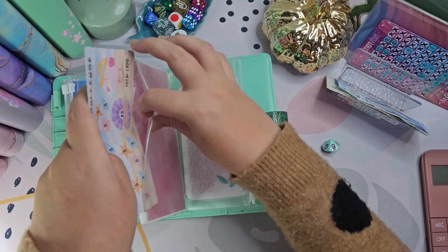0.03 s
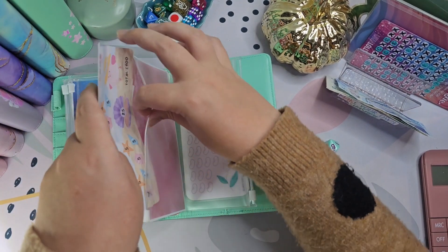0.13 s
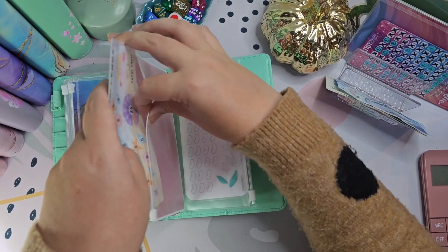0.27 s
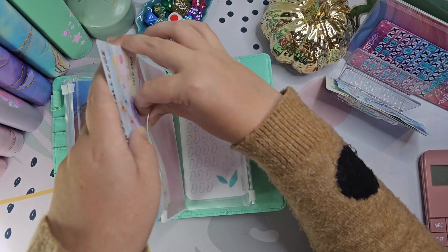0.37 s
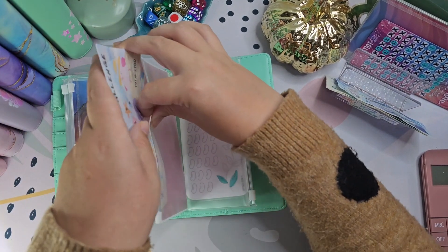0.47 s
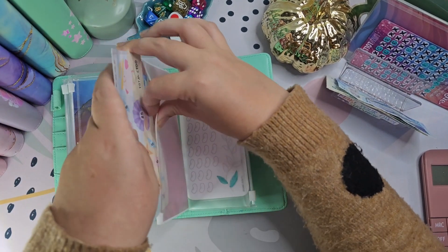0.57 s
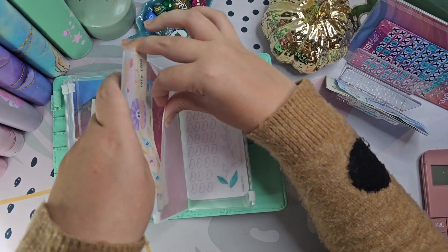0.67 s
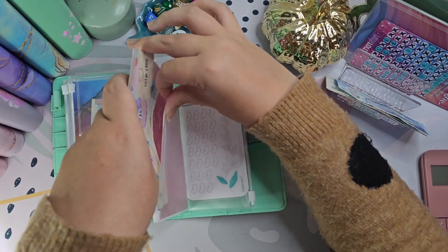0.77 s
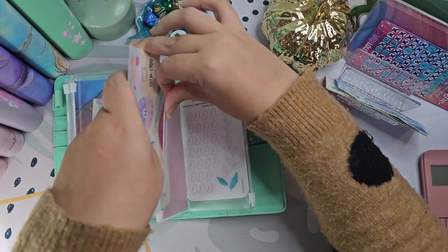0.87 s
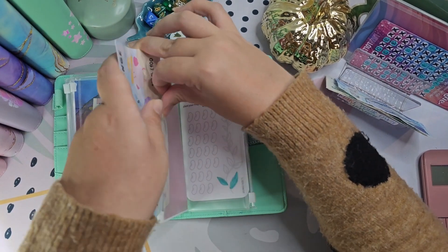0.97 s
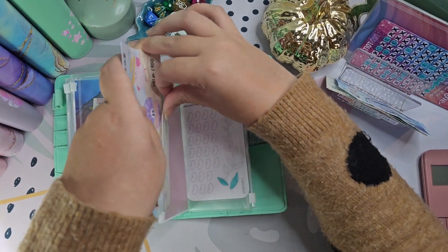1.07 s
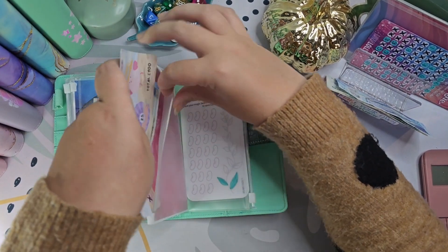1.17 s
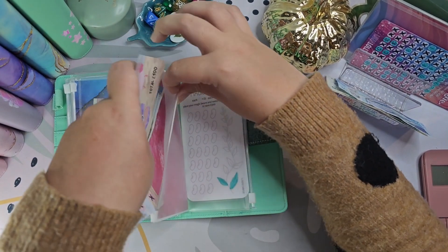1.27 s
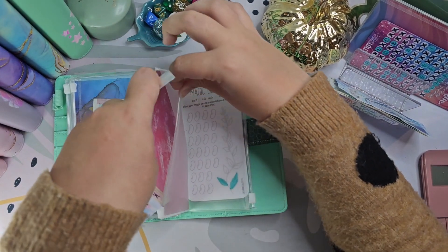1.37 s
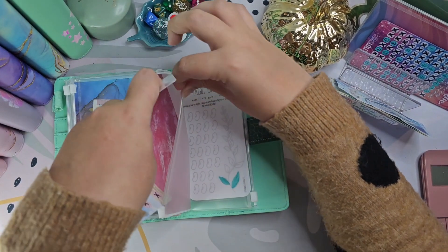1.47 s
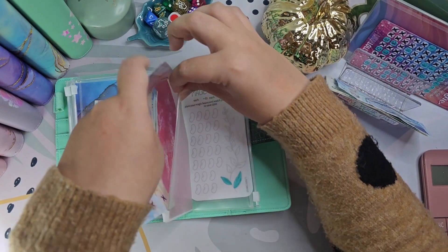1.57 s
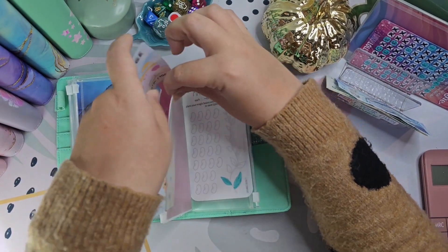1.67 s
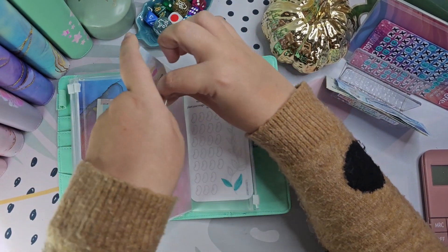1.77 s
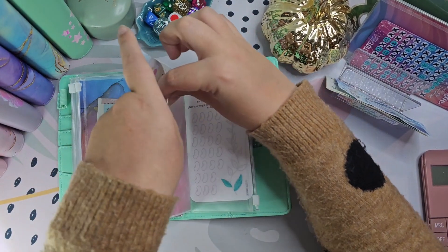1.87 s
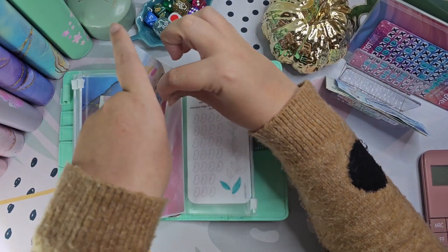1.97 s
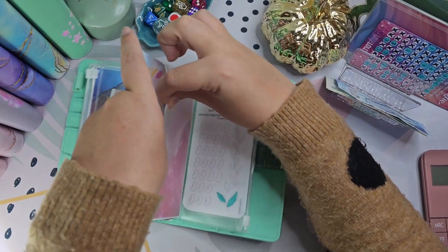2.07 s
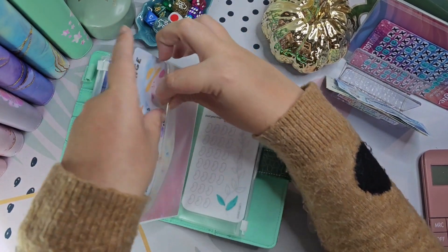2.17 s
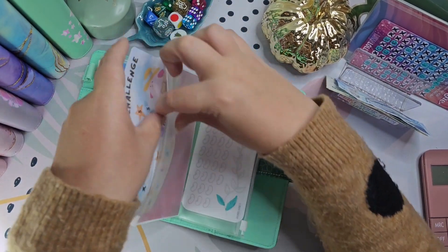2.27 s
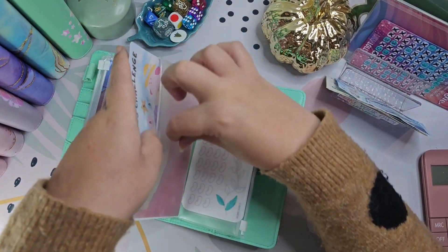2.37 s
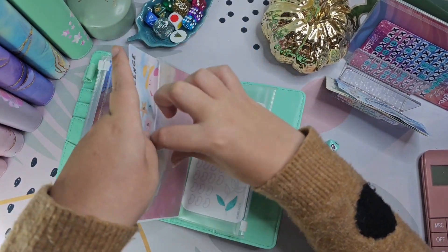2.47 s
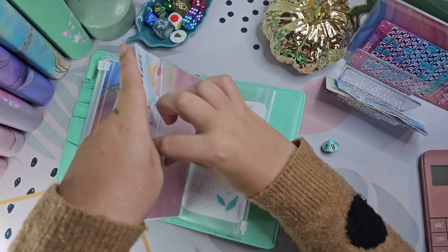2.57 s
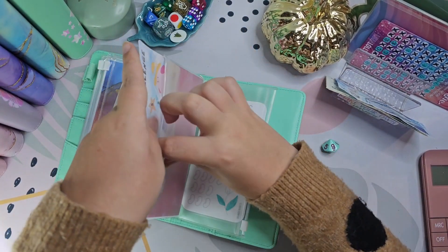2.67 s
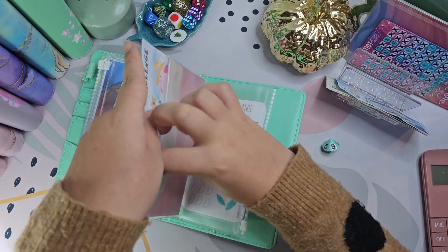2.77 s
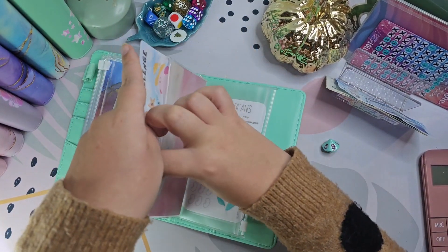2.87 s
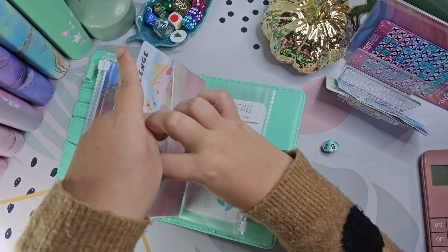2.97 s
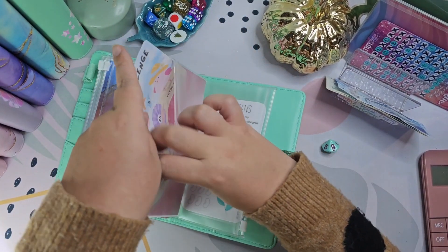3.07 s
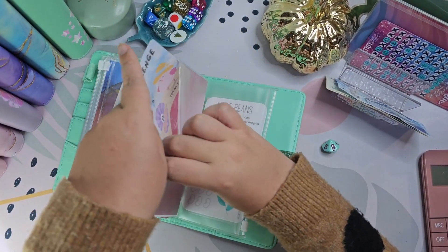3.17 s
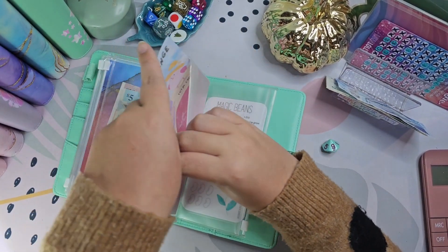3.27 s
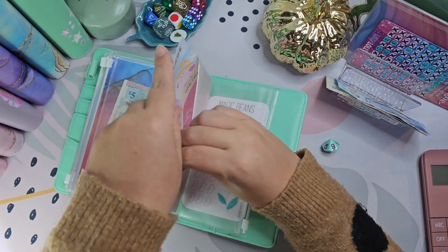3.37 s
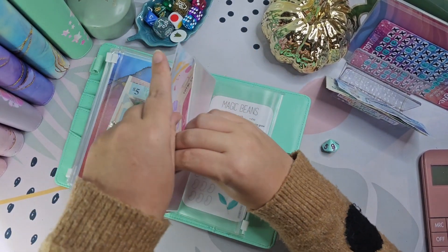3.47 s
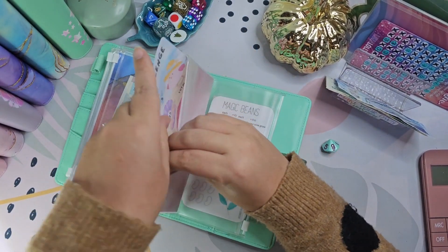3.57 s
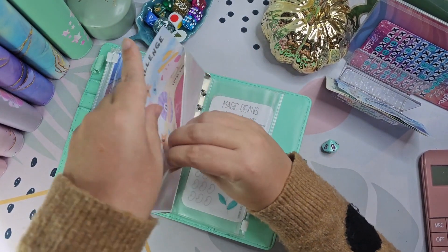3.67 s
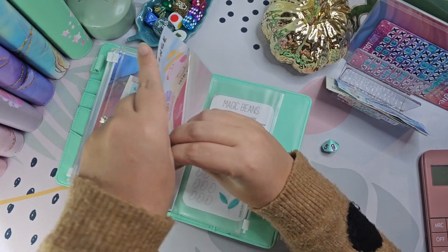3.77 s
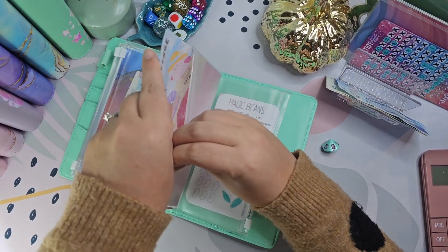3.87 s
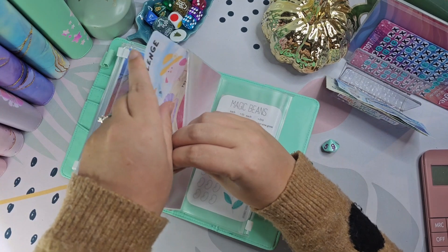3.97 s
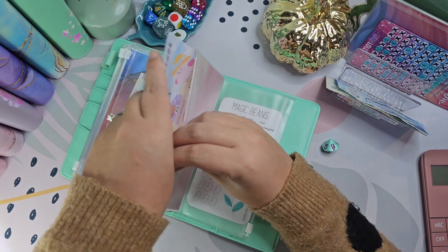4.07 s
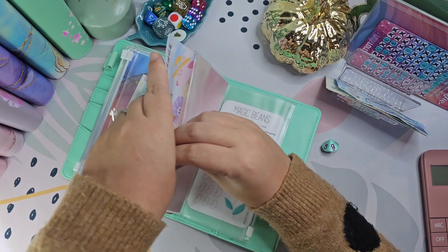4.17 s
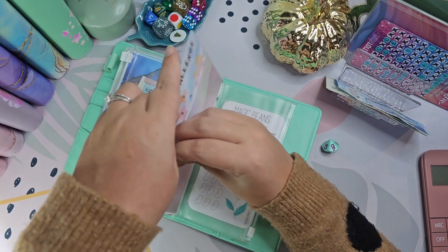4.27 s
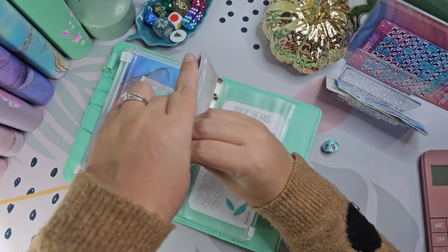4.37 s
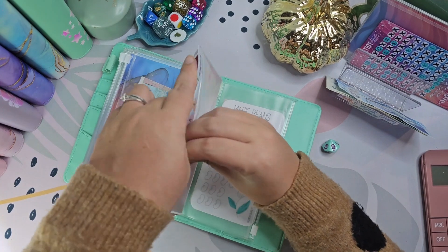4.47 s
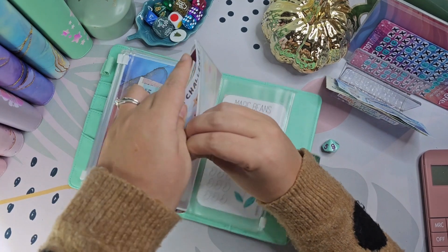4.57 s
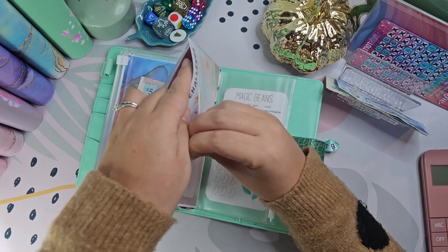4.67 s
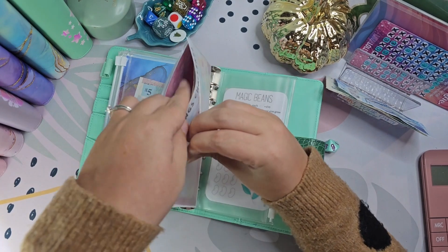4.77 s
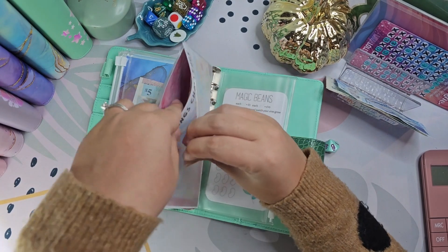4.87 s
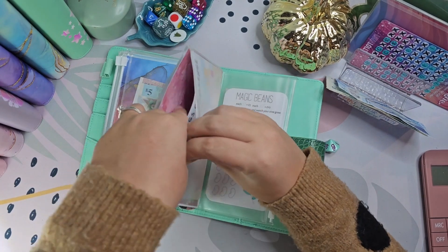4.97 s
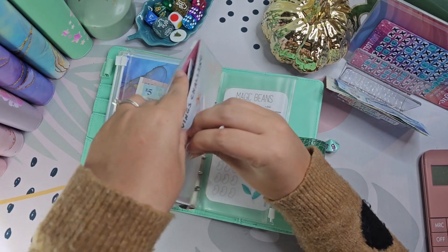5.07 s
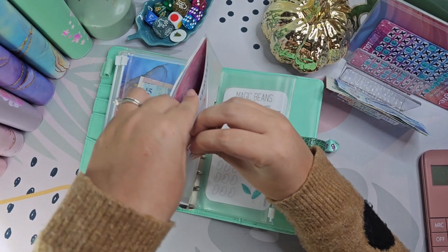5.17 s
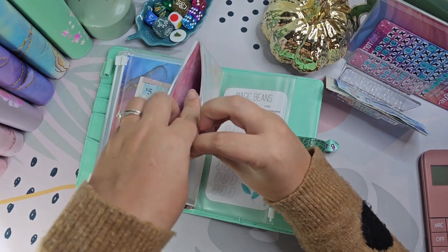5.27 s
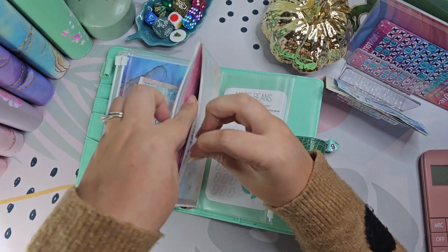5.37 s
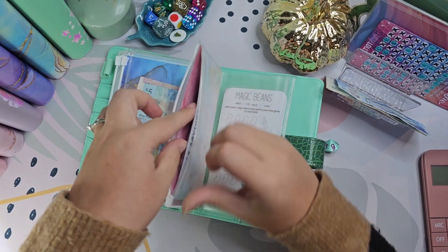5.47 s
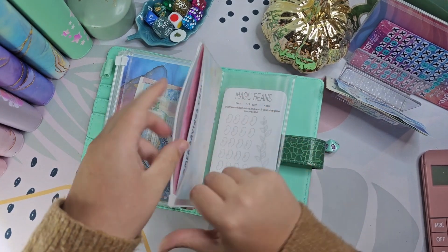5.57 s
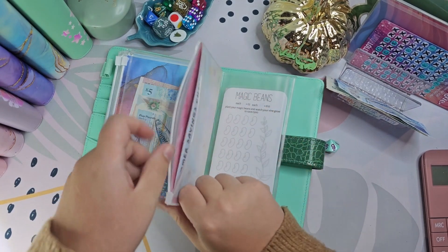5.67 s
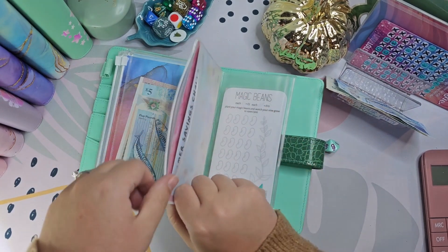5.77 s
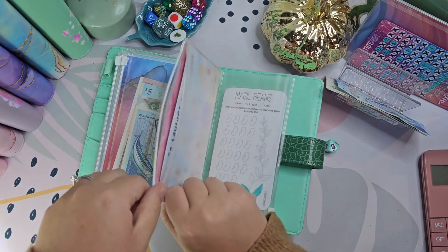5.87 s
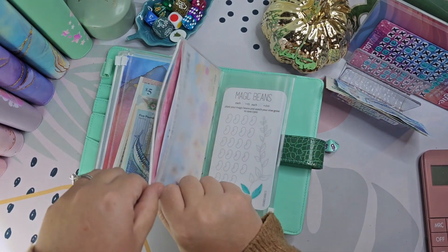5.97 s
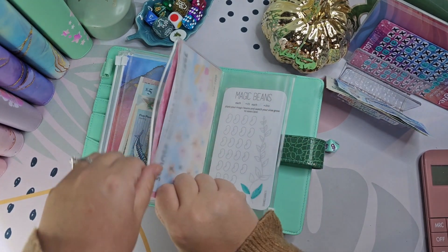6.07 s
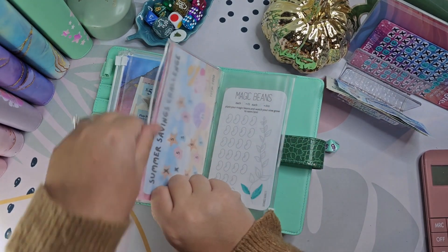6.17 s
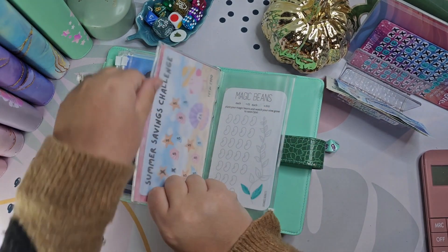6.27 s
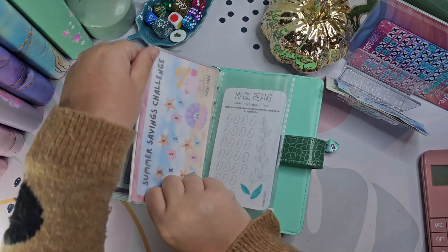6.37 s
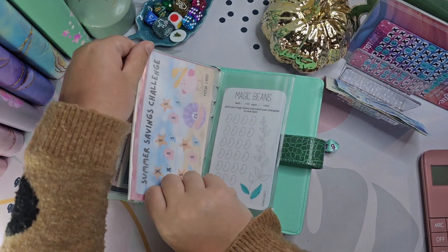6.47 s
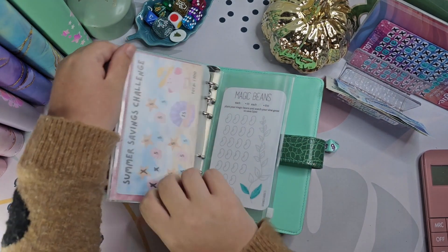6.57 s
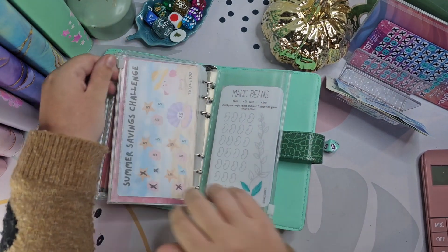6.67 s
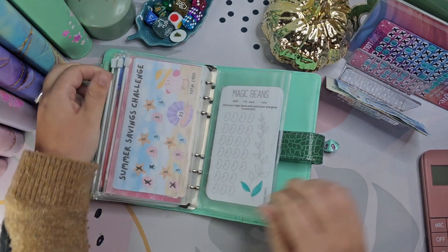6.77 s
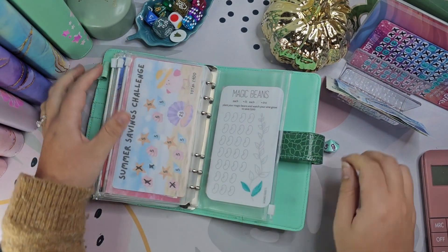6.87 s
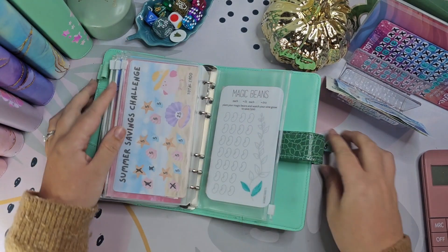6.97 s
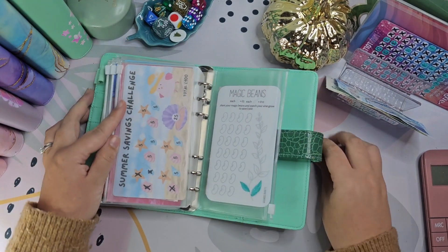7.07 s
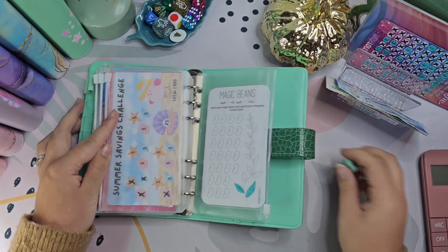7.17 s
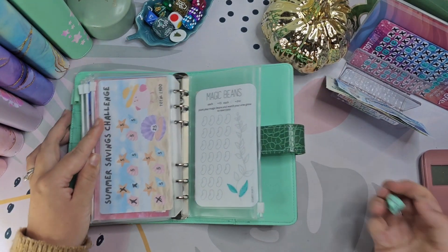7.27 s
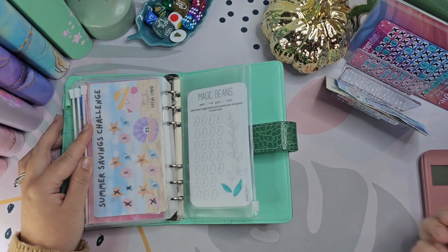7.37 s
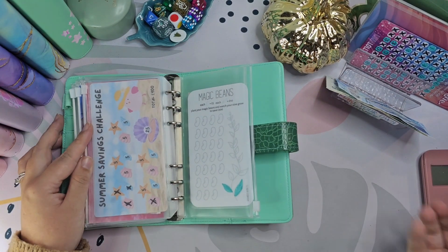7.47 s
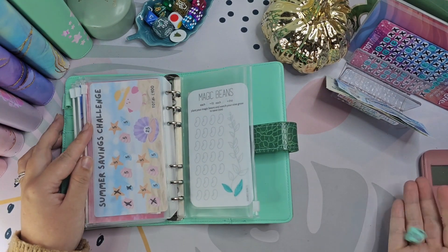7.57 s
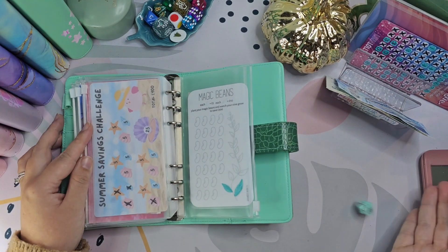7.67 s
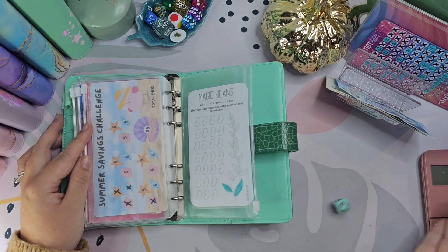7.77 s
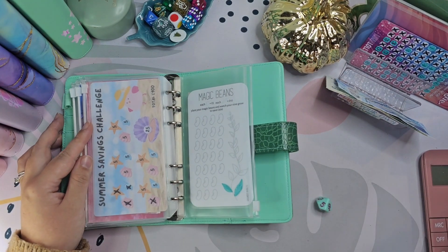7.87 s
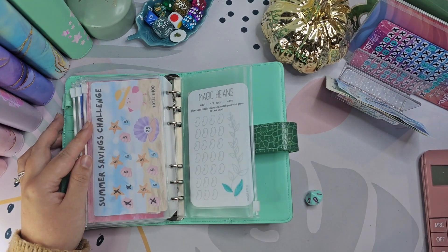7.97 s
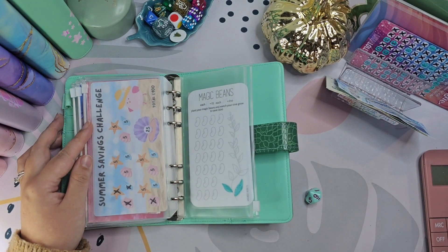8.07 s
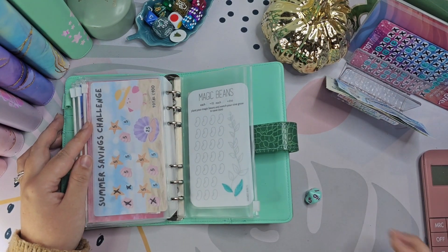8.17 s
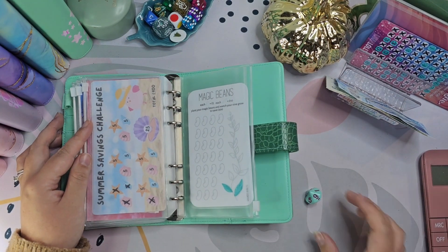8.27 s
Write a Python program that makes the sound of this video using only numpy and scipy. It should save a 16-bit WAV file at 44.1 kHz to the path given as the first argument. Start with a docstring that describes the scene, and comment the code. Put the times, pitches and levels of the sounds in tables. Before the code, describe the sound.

Close up in a quiet room, a paper card is worked into a plastic pocket of a ring binder. It scrapes and rustles in short, uneven strokes while the stiff film crinkles and snaps, and hands and pages bump softly on the desk. The binder slides aside with a brief hiss. Finally a small die lands on the desk mat with a louder knock and bounces quickly to rest.

```python
"""A desk in a quiet furnished room, close up. Two hands work a paper card into a clear plastic pocket
of a ring binder. Card and film rub over a faint, breath-like rush, the stiff film buckles in snaps,
hands and pages bump the desk, and the binder slides aside with a hiss. At the end a small die is thrown
and bounces to rest on the desk mat; each landing ticks and rings the modes of the desk top."""
import sys
import numpy as np
from scipy import signal
from scipy.fft import rfft, irfft
from scipy.io import wavfile

SR = 44100
rng = np.random.default_rng(int(sys.argv[2]) if len(sys.argv) > 2 else 0)


def materialize(psi):
    """Save the field psi as 16-bit PCM at rate SR to the path in sys.argv[1].

    A 1-D psi becomes a single channel; in a 2-D psi each row is a channel.
    """
    bounded = np.clip(np.atleast_2d(psi).T, -1, 1)
    quanta = np.round(bounded * 32767).astype(np.int16)
    wavfile.write(sys.argv[1], SR, quanta)


N = 367088
TIME_S = np.arange(N) / SR

# spectra: f/Hz, relative level/dB
AIR_SPECTRUM = [(15, -32.5), (25, -7.5), (33, -3), (120, -5), (195, -5.5), (309, -14), (818, -16.5),
                (1040, -26.5), (2690, -40), (3520, -28), (7110, -60), (11300, -26.5), (16000, -34.5)]  # room background
SLIDE_SPECTRUM = [(88, -33), (150, -10.5), (270, -4), (383, -12.5), (448, 0), (534, -20), (637, -9),
                  (1310, -7.5), (1830, -11), (3420, -5.5), (6390, -8.5), (16000, -15)]  # cover or sleeve on desk
FLEX_SPECTRUM = [(40, -13.5), (90, -3), (150, -3), (250, 1), (350, -8), (460, 2.5), (650, -6),
                 (1000, -10.5)]  # bending sheets
RUSH_SPECTRUM = [(350, -7.5), (480, -1), (700, -6.5), (1100, -6), (1300, -1), (1480, 5), (1700, -5.5),
                 (1920, -0.5), (2600, -8.5), (3400, -4), (4500, -9), (7000, -19), (12000, -22.5),
                 (16000, -29.5)]  # hollow, breath-like rush
SCRAPE_SPECTRUM = [(350, -18.5), (600, 0.5), (1000, 0), (1500, -0.5), (2000, 2.5), (2600, -7.5),
                   (3300, 3.5), (4500, -9), (6500, -19)]  # card in pocket
HISS_SPECTRUM = [(2200, -5.5), (3400, -2), (4600, 0.5), (6000, -4), (8000, -3.5), (10000, -7.5),
                 (11800, -1.5), (13500, -10.5), (16000, -11.5)]  # film on film
CRACK_SPECTRUM = [(700, -28), (1300, -2), (2000, -3), (2700, -6), (4000, -7), (5500, -11.5), (7500, -18.5)]  # snap, mids
SIZZLE_SPECTRUM = [(4500, -11), (7000, 3), (10000, -1), (12000, 2), (16000, -10)]  # snap, treble
FLUTTER_SPECTRUM = [(170, -8.5), (280, 8.5), (900, 6), (1400, -30.5)]  # snap, lows
TICK_SPECTRUM = [(900, 2), (1300, -14), (1900, -8), (2800, 2.5), (4500, 5), (5600, -7), (8000, -21),
                 (15000, -25)]  # hard die

# faint rush swelling and fading under the rustle: t/s, level/dB
RUSH_SWELLS = [(0, -63), (.13, -73.5), (.21, -64.5), (.7, -62.5), (1.05, -66), (1.6, -68), (2.3, -66.5),
               (2.86, -71.5), (3.15, -61), (3.5, -61), (4.05, -68), (4.8, -77), (5.45, -61), (5.68, -67.5),
               (6.08, -66.5), (6.46, -73.5), (6.95, -66), (7.4, -75)]
# binder sliding over the desk: t/s, level/dB
BINDER_SLIDE = [(6.85, -94), (6.95, -63.5), (7.11, -55.5), (7.27, -56.5), (7.35, -63.5), (7.42, -85.5)]
# sleeve brushing the desk: peak t/s, half length/s, level/dB
SLEEVE_BRUSHES = [(7.54, 0.025, -75.5), (8.325, 0.016, -64.5)]
# hands and pages landing, and the deep thump under the big snap near 2.69 s: t/s, knock f/Hz, knock level/dB,
# weight level/dB
DESK_BUMPS = [(.238, 252, -51.5, -70), (0.51, 291, -33, -66), (0.623, 240, -36, -50), (1.12, 275, -32, -47),
              (1.162, 152, -42, -42), (1.649, 143, -51, -55), (2.105, 262, -38.5, -65),
              (2.694, 290, -33.5, -72), (2.696, 432, -29, -68), (3.793, 222, -39, -68),
              (3.885, 188, -67, -54.5), (4.27, 256, -33, -43), (4.388, 485, -43.5, -50),
              (4.928, 160, -43.5, -55), (5.057, 330, -58, -57), (6.405, 110, -59, -67),
              (6.796, 267, -40.5, -48), (6.976, 254, -40.5, -43), (7.064, 120, -62, -50)]
# whole desk heaving under weight: f/Hz, level re weight/dB, t60/s
HEAVE_MODES = [(119, -2.5, 0.069), (56, -6.5, 0.22)]
# card pushes and film wipes: peak t/s, half length/s, scrape level/dB, hiss re scrape/dB
CARD_STROKES = [(0.294, 0.094, -67.5, -3.5), (0.406, .04, -73, 4.5), (0.454, 0.015, -57.5, -8.5),
                (0.592, 0.063, -67, 3.5), (0.942, 0.038, -58, -0.5), (1.14, 0.036, -56.5, -7),
                (1.37, 0.024, -53, -6), (1.545, 0.035, -55, -4), (1.745, 0.056, -57, 2),
                (1.748, .012, -55, 23.5), (1.935, 0.028, -58.5, -14.5), (2.084, 0.055, -62.5, 0.5),
                (2.202, 0.025, -59, 3.5), (2.31, 0.011, -55, 1), (2.347, 0.052, -67.5, 1),
                (3.404, 0.039, -67, 4.5), (3.62, 0.034, -54, -6), (3.78, 0.04, -60, -3.5),
                (3.875, 0.011, -48, -5), (3.93, 0.062, -66.5, -1), (4.112, 0.031, -63, -6),
                (4.193, 0.021, -48, -8.5), (4.281, 0.089, -58, -4), (4.424, 0.013, -54, -27),
                (4.494, 0.026, -58, 1.5), (4.603, 0.043, -61.5, 1), (4.745, 0.058, -65.5, 4),
                (4.92, 0.035, -58.5, 7.5), (4.937, 0.012, -45.5, -3), (5.071, 0.034, -54, -5),
                (5.168, 0.021, -78.5, 20), (5.233, 0.027, -57, -3), (5.32, 0.021, -60, 2.5),
                (5.468, 0.02, -60, -4), (5.544, 0.021, -56.5, -3.5), (5.646, 0.038, -68.5, 1),
                (6.147, 0.023, -77, 14), (6.25, 0.08, -75, 9.5), (6.584, 0.032, -66.5, 7.5),
                (6.66, 0.073, -77, -2.5), (6.798, 0.048, -69, 9.5), (6.936, 0.025, -64, 4.5)]
# short pitched rasps and the brief ring of snaps: peak t/s, half length/s, f/Hz, level/dB
RASPS_AND_RINGS = [(.888, 0.0044, 990, -57), (1.167, 0.012, 730, -63), (1.501, .017, 920, -51),
                   (1.502, 0.018, 3050, -56.5), (1.555, 0.018, 880, -50), (1.708, 0.026, 930, -58.5),
                   (1.734, .003, 4690, -39.5), (1.78, 0.031, 1020, -58.5), (2.312, 0.0028, 760, -48),
                   (2.695, 0.0013, 3920, -31.5), (3.642, 0.01, 3170, -47), (3.867, 0.0048, 1430, -43),
                   (3.952, .019, 2770, -57), (4.186, 0.013, 1860, -52), (4.198, .012, 970, -64),
                   (4.268, 0.0026, 1400, -33), (4.741, 0.0072, 1330, -58), (5.102, 0.0077, 2090, -51),
                   (5.263, 0.012, 1330, -58), (5.322, 0.017, 1960, -55.5), (5.431, 0.058, 407, -63.5),
                   (5.535, 0.006, 1970, -52.5), (6.531, 0.0091, 1680, -59.5), (6.589, 0.0065, 1720, -48.5),
                   (6.769, 0.0021, 4300, -43)]
# whole sheet buckling: t/s, swing level/dB, sheet f/Hz, burst time scale/s, sizzle re crack/dB
SHEET_BUCKLES = [(0.613, -42, 235, 0.0024, -1), (.616, -42, 250, 0.0031, -1), (1.018, -54, 284, 0.0019, -6),
                 (1.119, -44, 890, 0.0043, -14), (1.153, -44.5, 780, 0.0061, -5.5),
                 (1.3778, -30.5, 760, 0.0023, -6), (2.4335, -54, 332.6, 0.0028, -4),
                 (2.5823, -49.5, 764, 0.001, -2), (2.6944, -32.5, 570, 0.0015, -4),
                 (3.104, -52, 460, 0.0021, -10), (3.2626, -45.5, 276, 0.0022, -3),
                 (3.581, -53, 580, 0.0013, -12), (3.7935, -44, 510, 0.0023, -23),
                 (4.2641, -39, 382, 0.0022, -7.5), (4.268, -37, 368, 0.0022, -3.5),
                 (4.939, -49.5, 433, 0.005, 5), (6.578, -55.5, 700, 0.0018, 2)]
# corner or crease flicking over: t/s, crack level/dB, sizzle re crack/dB
CREASE_FLICKS = [(0.0562, -59, -10), (0.1807, -59, -24), (.2, -72, -22), (0.3352, -62, -6),
                 (0.7214, -60.5, 1), (1.3412, -48, -2), (1.4, -58, 8.5), (2.091, -58, -14),
                 (2.298, -52, -20.5), (3.014, -63, 9), (3.312, -58.5, -14), (3.452, -42.5, -4),
                 (3.748, -49, -9.5), (4.035, -62.5, 0), (4.388, -45.5, -22), (4.577, -48, -8),
                 (4.653, -54, -10), (4.828, -58, -2.5), (4.9234, -54, 5), (4.972, -45, -2.5),
                 (4.983, -46.5, -23), (5.0586, -54, -1.5), (5.1204, -51.5, -5), (5.2558, -52, -2),
                 (5.4513, -51.5, -8), (6.403, -66, 6.5), (6.5861, -51, -17), (6.74, -57.5, 6.5),
                 (6.772, -63.5, 11.5), (6.9326, -60, 3)]
# desk top modes: f/Hz, relative level/dB, t60/s
DESK_MODES = [(43.2, -15.5, 0.55), (131, -12.5, 0.086), (214, -10.5, 0.073), (274.5, 1, 0.086),
              (316.5, 2.5, 0.056), (432, 4.5, 0.036), (605, -9.5, 0.12), (746, -6.5, 0.049),
              (970, -3.5, 0.035), (1265, -22.5, 0.076)]
# die landings: t/s, thud level/dB, tick level/dB, contact time/s
DIE_BOUNCES = [(7.701, -17.5, -42, 0.00036), (7.8070, -24.5, -52.5, 0.0015), (7.876, -33.5, -70, 0.0023),
               (7.8832, -32, -62, 0.00152), (7.932, -30, -67, 0.0015), (7.996, -38, -86, 0.0017),
               (8.026, -52, -94, 0.004)]


def from_db(db):
    """Decibels to gain."""
    return 10 ** (np.asarray(db) / 20)


def unit_rms(x):
    """Scale to rms 1."""
    return x / np.sqrt(np.mean(x ** 2) + 1e-20)


def unit_blow(x):
    """Scale to the energy of 10 ms at rms 1."""
    return x / np.sqrt(np.mean(np.sum(x ** 2, axis=-1)) / (SR / 100) + 1e-20)


def envelope(curve):
    """Gain per sample from rows of t/s, level/dB."""
    return from_db(np.interp(TIME_S, *np.transpose(curve)))


def add(out, start_s, x):
    """Mix x into out from start_s."""
    i = max(round(start_s * SR), 0)
    out[..., i:i + x.shape[-1]] += x[..., :N - i]


def colour(x, spectrum, size=4096):
    """Minimum-phase filter; falls 20 dB/octave for two octaves past the spectrum's ends."""
    hz, db = np.transpose(spectrum)
    octave = np.log2(np.maximum(np.fft.rfftfreq(size, 1 / SR), 5))
    beyond = np.abs(octave - np.clip(octave, np.log2(hz[0]), np.log2(hz[-1])))
    response_db = np.interp(octave, np.log2(hz), db) - 20 * np.minimum(beyond, 2)
    cepstrum = irfft(np.log(from_db(response_db)))
    cepstrum[1:size // 2] *= 2
    cepstrum[size // 2 + 1:] = 0
    impulse = irfft(np.exp(rfft(cepstrum)))
    return signal.oaconvolve(x, impulse[None], axes=-1)[:, :x.shape[-1]]


def butter(x, kind, hz):
    """Butterworth filter, order 2."""
    return signal.sosfilt(signal.butter(2, hz, kind, fs=SR, output="sos"), x + 1e-18)


def resonance(x, hz, width_hz):
    """Two-pole band-pass, peak gain 1."""
    r = np.exp(-np.pi * width_hz / SR)
    feedback = [1, -2 * r * np.cos(2 * np.pi * hz / SR), r * r]
    return signal.lfilter(np.array([1, 0, -1]) * (1 - r * r) / 2, feedback, x)


def drift(rate_hz, count=4096):
    """Random curve, rms 1, with rate_hz points a second."""
    return unit_rms(np.interp(TIME_S * rate_hz, np.arange(count), rng.standard_normal(count)))


def noise(correlation, count=N):
    """Stereo white noise, partly correlated."""
    mid, side = rng.standard_normal((2, count))
    return (np.sqrt(1 + correlation) * mid + np.sqrt(1 - correlation) * side * [[1], [-1]]) / np.sqrt(2)


def grainy_noise(spectrum, correlation, grain_rate_hz, share, judder_db, judder_hz):
    """Fine noise plus tiny grains, which hold the given share of the power; the level judders."""
    sizes = from_db(2 * np.minimum(rng.exponential(1, N), 4))
    grains = unit_rms(noise(correlation) * sizes * (rng.random(N) < grain_rate_hz / SR))
    drive = np.sqrt(share) * grains + np.sqrt(1 - share) * noise(correlation)
    judder = from_db(judder_db * drift(judder_hz))
    return unit_rms(colour(drive * judder, spectrum))


def place(x, right_lag_s):
    """Sound from one side reaches the far microphone later."""
    return np.array([x[0], np.roll(x[1], round(right_lag_s * SR))])


def hand_speed(peak_s, half_s, lean=0.059):
    """Bell-shaped speed, rising a little slower than it falls. Returns start time and speed."""
    start_s = max(peak_s - 6 * half_s, 0)
    t = np.arange(start_s - peak_s, 6 * half_s, 1 / SR)
    sigma_s = half_s * (1 - lean * np.sign(t))
    return start_s, np.exp(-.5 * (t / sigma_s) ** 2)


def room(x, wet_db, t60_s=0.13, treble_t60_s=0.055, first_echo_s=0.003):
    """Dense echoes off clutter and walls; bass alike in both channels, treble dies first."""
    t = np.arange(SR // 3) / SR
    low = butter(noise(0.6, len(t)), "low", 800)
    middle = butter(noise(0.04, len(t)), "band", [800, 5500])
    high = butter(noise(0, len(t)), "high", 5500)
    echoes = (low + middle) * from_db(-60 * t / t60_s) + high * from_db(3 - 60 * t / treble_t60_s)
    echoes *= t > first_echo_s
    echoes /= np.sqrt(np.sum(echoes ** 2) / 2)
    return x + from_db(wet_db) * signal.oaconvolve(x, echoes, axes=-1)[:, :N]


def room_air(level_db=-75.5):
    """Faint, steady rumble of the room."""
    return from_db(level_db) * unit_rms(colour(noise(0.56), AIR_SPECTRUM))


def hollow_rush():
    """A faint, hollow, breath-like rush swells and fades under the rustle."""
    rush = grainy_noise(RUSH_SPECTRUM, 0.34, grain_rate_hz=790, share=0.27, judder_db=2.5, judder_hz=38)
    return from_db(-1) * envelope(RUSH_SWELLS) * rush


def desk_sliding():
    """The smooth cover, later a sleeve, glides over the desk with an even hiss."""
    gain = envelope(BINDER_SLIDE) * (TIME_S > BINDER_SLIDE[0][0])
    for peak_s, half_s, db in SLEEVE_BRUSHES:
        start_s, speed = hand_speed(peak_s, half_s)
        add(gain, start_s, from_db(db) * speed)
    return gain * unit_rms(colour(noise(0.12), SLIDE_SPECTRUM))


def desk_bumps(rise_s=0.001, knock_t60_s=0.048):
    """Hands and pages land softly, and the big snap near 2.69 s thumps: a dull knock with a brush of noise; the
    weight heaves the desk."""
    out, t = np.zeros((2, N)), np.arange(SR // 2) / SR
    for at_s, knock_hz, knock_db, weight_db in DESK_BUMPS:
        heave = [(hz, weight_db + db, t60_s) for hz, db, t60_s in HEAVE_MODES]
        for hz, db, t60_s in [(knock_hz, knock_db, knock_t60_s)] + heave:
            brush = unit_rms(resonance(noise(1, len(t)), 0.97 * hz, hz))
            dull_brush = signal.lfilter([.1], [1, -.9], brush)
            swing = np.sin(2 * np.pi * hz * t) + from_db(-7) * dull_brush
            add(out, at_s, from_db(db - 60 * t / t60_s) * (1 - np.exp(-t / rise_s)) * swing)
    return butter(out, "high", 35.4)


def sheet_flex():
    """Bending sheets: a dull, uneven rumble."""
    return unit_rms(colour(noise(0.91), FLEX_SPECTRUM)) * from_db(2 * drift(30))


def crinkle(low_hz, high_hz, rate_hz, q, spread_db, bands=9):
    """Creases give way in clumps; each click rings briefly in one of several bands."""
    fired = rng.random(N) < rate_hz * from_db(4 * drift(45)) / SR
    clicks = fired * from_db(spread_db * np.minimum(rng.exponential(1, N), 3)) * noise(0.4)
    band, out = rng.integers(0, bands, N), 0
    for k, hz in enumerate(np.geomspace(low_hz, high_hz, bands)):
        out += resonance(clicks * (band == k) + 1e-18, hz, hz / q) / np.sqrt(hz)
    return unit_rms(out)


def pocket_bowing(low_hz=950, high_hz=4600, q=20, shift_db=7, shift_rate_hz=16, bands=7):
    """As the pocket bows, scraping wakes now one resonance, now another."""
    drive, out = noise(0.4), 0
    for hz in np.geomspace(low_hz, high_hz, bands):
        gain = from_db(shift_db * np.minimum(drift(shift_rate_hz), 1.5))
        out += gain * resonance(drive, hz, hz / q) / np.sqrt(hz)
    return unit_rms(out)


def stroke_gains():
    """Scrape and hiss gains follow hand speed, summed over all strokes."""
    out = np.zeros((2, N))
    for peak_s, half_s, db, hiss_db in CARD_STROKES:
        start_s, speed = hand_speed(peak_s, half_s)
        add(out, start_s, from_db([[db], [db + hiss_db]]) * speed)
    return out


def pocket_rustle():
    """The card scrapes in tiny slips, film hisses on film, creases crinkle, sheets flex."""
    scrape, hiss = stroke_gains()
    card = grainy_noise(SCRAPE_SPECTRUM, 0.3, grain_rate_hz=800, share=0.21, judder_db=7.5, judder_hz=76)
    film = grainy_noise(HISS_SPECTRUM, 0.1, grain_rate_hz=540, share=0.096, judder_db=2.5, judder_hz=80)
    out = from_db(-0.5) * scrape * card + from_db(-0.55) * hiss * film
    out += from_db(-2.5) * scrape * pocket_bowing()
    pushed = np.minimum(scrape, 2 * hiss)  # creases yield only where the film itself is pushed
    out += from_db(-4) * pushed * crinkle(1000, 4800, rate_hz=230, q=18, spread_db=4.5)
    out += from_db(-10) * hiss * crinkle(4000, 13000, rate_hz=190, q=31, spread_db=7)
    rumble_gain = from_db(-4.5) * envelope(RUSH_SWELLS) + from_db(-12.5) * scrape
    return out + rumble_gain * sheet_flex()


def rasps_and_rings(relative_width=0.38):
    """Short pitched rasps and the brief ring of snaps: band noise that swells and fades."""
    out, t = np.zeros((2, N)), np.arange(-SR // 10, SR // 10) / SR
    for peak_s, half_s, hz, db in RASPS_AND_RINGS:
        width_hz = hz * relative_width
        tone = resonance(resonance(noise(1, len(t)), hz, width_hz), hz, width_hz)
        add(out, peak_s + t[0], from_db(db) * unit_rms(tone) * np.exp(-.5 * (t / half_s) ** 2))
    return out


def add_snap(out, at_s, hz, swing_db, crack_db, sizzle_db, scale_s,
             rise_s=0.00076, lead_in_s=0.0055, chatter_s=0.02, decay_cycles=0.97):
    """Film buckles: a burst of cracks over a heavily damped swing of the sheet."""
    t = np.arange(-512, 4096) / SR
    since_s = np.maximum(t, 0)
    release = np.exp(-(since_s / (1.44 * scale_s)) ** 2)
    chatter = from_db(-21) * np.exp(-since_s / chatter_s)
    lead_in = from_db(-19) * np.exp(-np.abs(t) / lead_in_s)  # faint noise swells in just before the snap
    burst = (1 - np.exp(-since_s / rise_s)) * (release + chatter) + lead_in
    cracks = noise(0.13, len(t)) * burst
    cycles = since_s * hz
    swing = np.sin(2 * np.pi * cycles) * cycles * np.exp(-2 * cycles / decay_cycles)
    swing = unit_blow(butter(swing, "high", hz / 2))  # small surfaces radiate little bass
    flutter = unit_blow(colour(noise(0.82, len(t)) * burst, FLUTTER_SPECTRUM))
    sheet = from_db(swing_db) * unit_blow(swing + from_db(-5.5) * flutter)
    crack = from_db(crack_db) * unit_blow(colour(cracks, CRACK_SPECTRUM))
    sizzle = from_db(crack_db + sizzle_db) * unit_blow(colour(cracks, SIZZLE_SPECTRUM))
    pan_db = rng.normal(0.8, 0.8)  # left minus right
    add(out, at_s + t[0], from_db([[pan_db / 2], [-pan_db / 2]]) * (sheet + crack + sizzle))


def film_snaps(typical_swing_db=-46, typical_crack_db=-48.5, flick_hz=1080):
    """Big buckles are mostly swing, small flicks mostly crack."""
    out = np.zeros((2, N))
    for at_s, swing_db, hz, scale_s, sizzle_db in SHEET_BUCKLES:
        crack_db = typical_crack_db + 0.57 * (swing_db - typical_swing_db)  # grows slower than the swing
        add_snap(out, at_s, hz, swing_db, crack_db, sizzle_db, scale_s)
    for at_s, crack_db, sizzle_db in CREASE_FLICKS:
        hz = flick_hz * 2 ** rng.uniform(-0.34, 0.84)
        add_snap(out, at_s, hz, crack_db - 7.5, crack_db, sizzle_db, scale_s=0.0014)
    return out


def die_throw(tick_s=0.001, rattle_db=-19, rattle_s=0.013, spread_s=0.00085):
    """Each landing drives the desk's modes, duller for longer contact; the hard die adds a tick."""
    out, t = np.zeros((2, N)), np.arange(SR // 2) / SR
    for at_s, thud_db, tick_db, contact_s in DIE_BOUNCES:
        force = np.sin(np.pi * np.minimum(t / contact_s, 1))
        spot = rng.normal(0, [1.5, .025], (len(DESK_MODES), 2))  # landing spot varies level and pitch
        modes = sum(from_db(db + offset_db - 60 * t / t60_s) * np.sin(2 * np.pi * hz * (1 + detune) * t)
                    for (hz, db, t60_s), (offset_db, detune) in zip(DESK_MODES, spot))
        modes *= 1 - np.exp(-t / spread_s)  # bending wave spreads over the top
        thud = butter(signal.fftconvolve(modes, force)[:len(t)], "high", 82)
        decay = np.exp(-t / tick_s) + from_db(rattle_db) * np.exp(-t / rattle_s)
        tick = colour(noise(0.76, len(t)) * decay, TICK_SPECTRUM)
        add(out, at_s, from_db(thud_db) * thud / np.abs(thud).max() + from_db(tick_db) * unit_blow(tick))
    return out


def scene():
    """Binder a little to the left, die to the right, over the room's rumble."""
    near = hollow_rush() + pocket_rustle() + rasps_and_rings() + film_snaps()
    near += desk_bumps() + desk_sliding()
    die = room(place(die_throw(), right_lag_s=-.00009), wet_db=-15)
    return room_air() + room(place(near, right_lag_s=.00013), wet_db=-9) + die


def record(dry):
    """Steep low-pass at 16.2 kHz."""
    return signal.sosfilt(signal.ellip(12, .1, 70, 16200, fs=SR, output="sos"), dry)


dry = scene()
out = record(dry)
materialize(out)
```